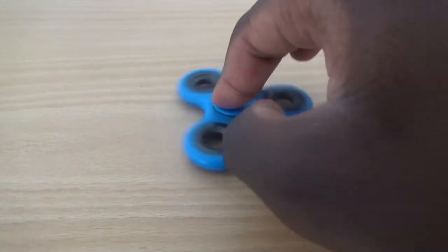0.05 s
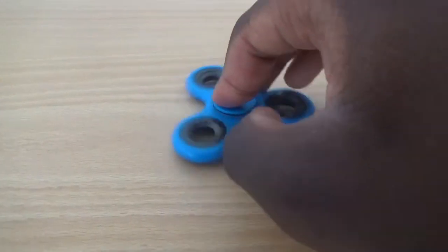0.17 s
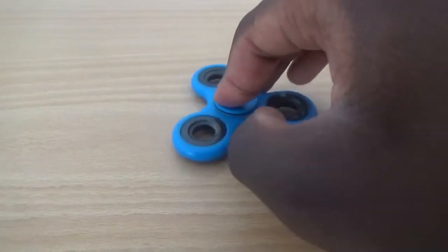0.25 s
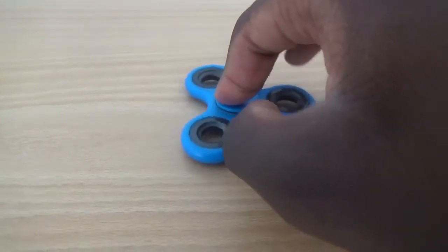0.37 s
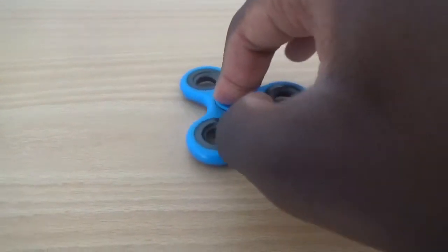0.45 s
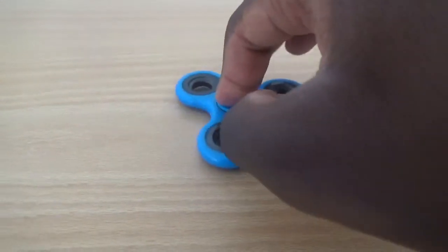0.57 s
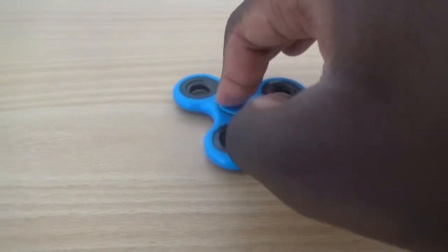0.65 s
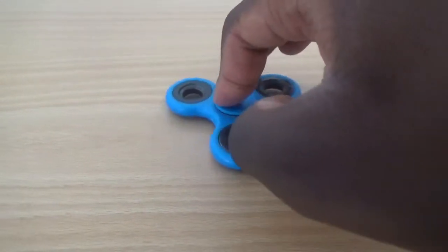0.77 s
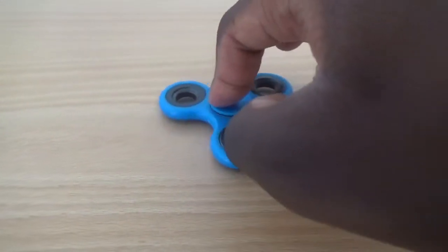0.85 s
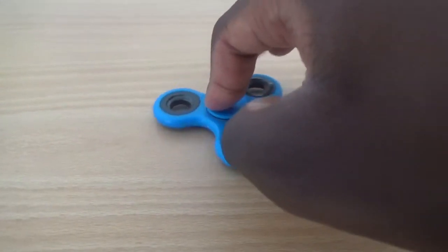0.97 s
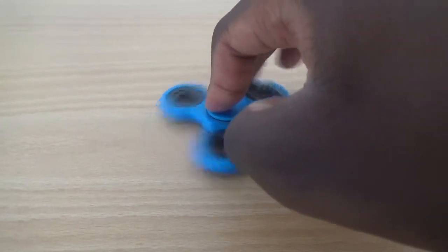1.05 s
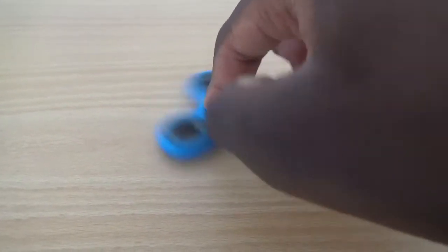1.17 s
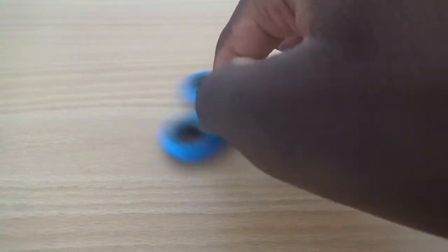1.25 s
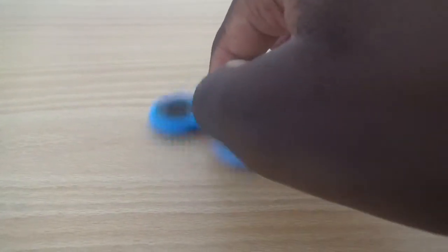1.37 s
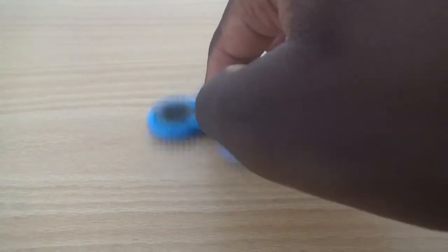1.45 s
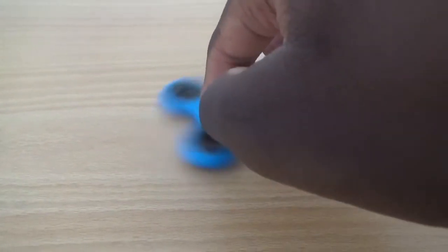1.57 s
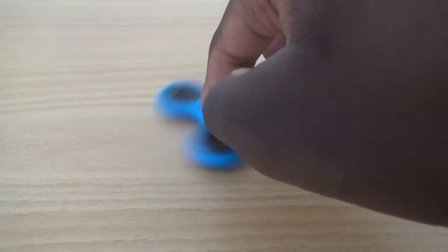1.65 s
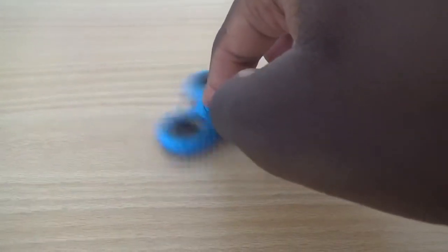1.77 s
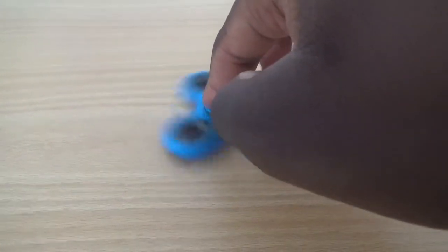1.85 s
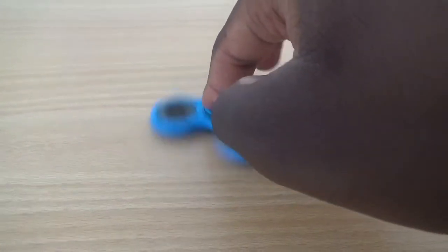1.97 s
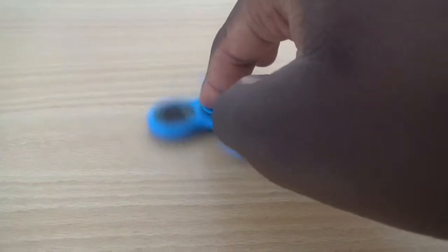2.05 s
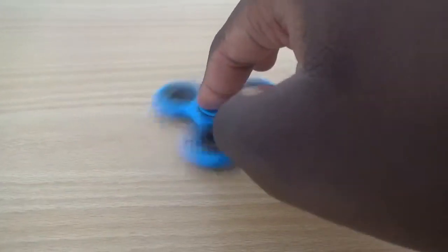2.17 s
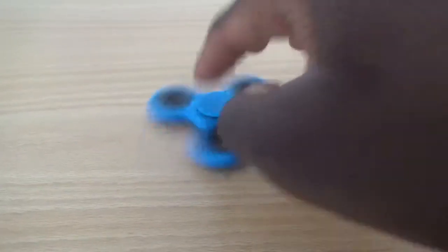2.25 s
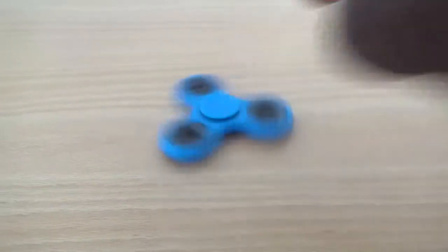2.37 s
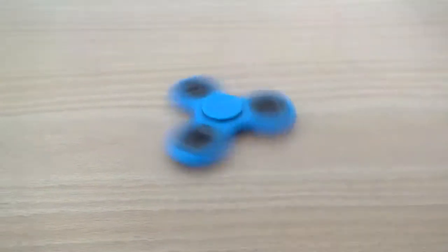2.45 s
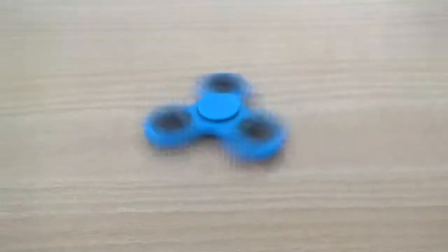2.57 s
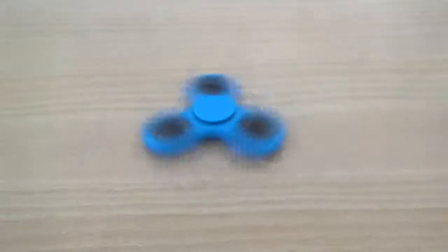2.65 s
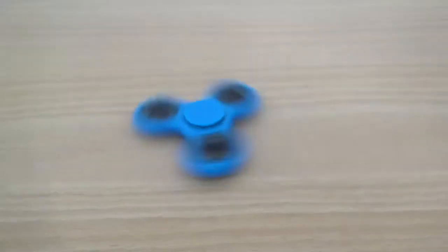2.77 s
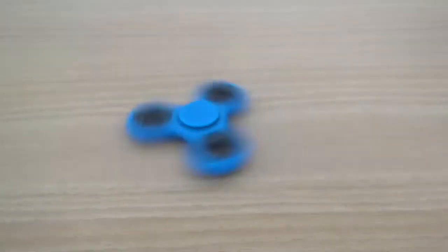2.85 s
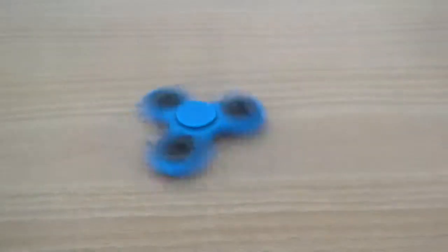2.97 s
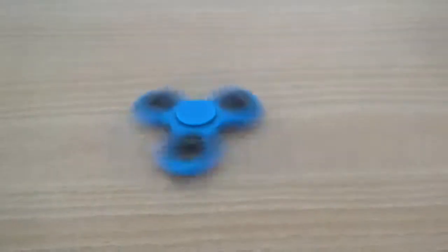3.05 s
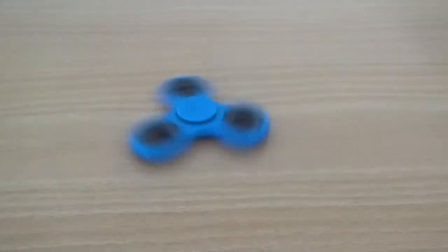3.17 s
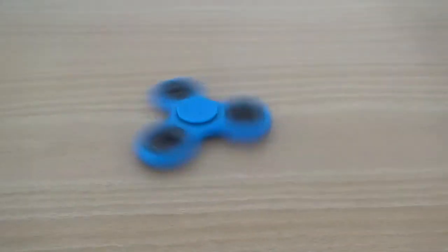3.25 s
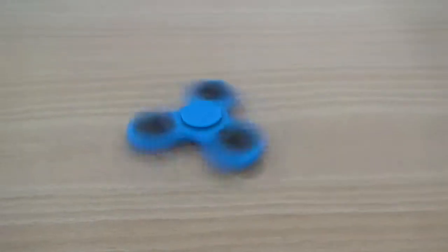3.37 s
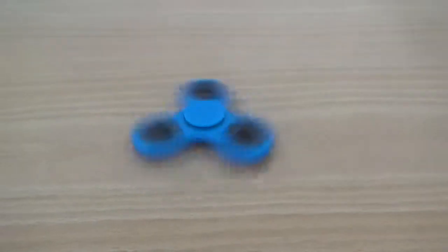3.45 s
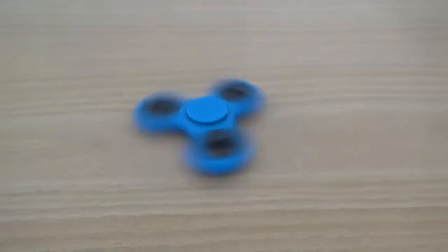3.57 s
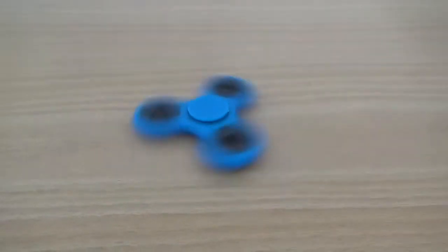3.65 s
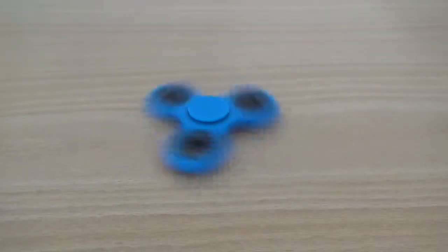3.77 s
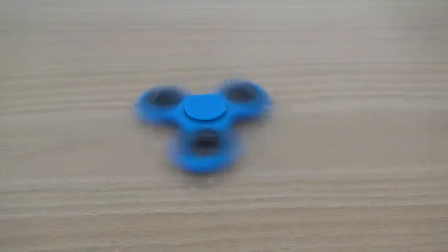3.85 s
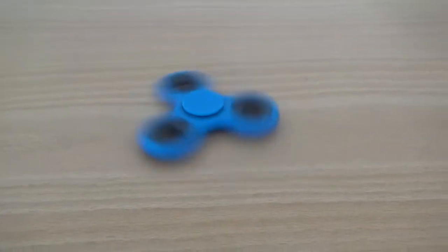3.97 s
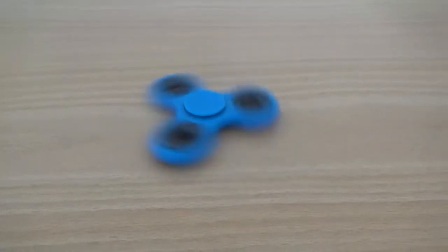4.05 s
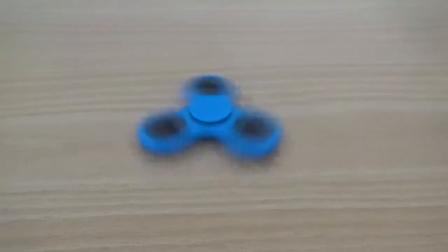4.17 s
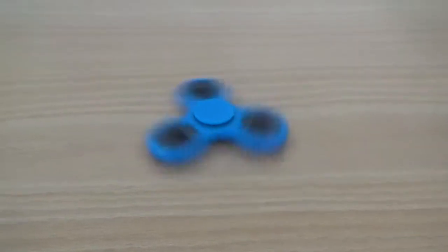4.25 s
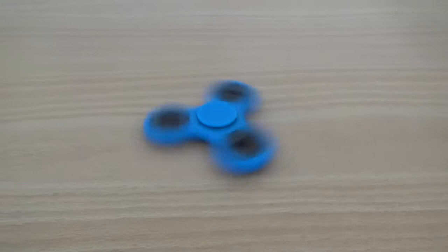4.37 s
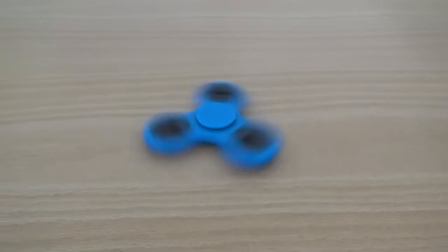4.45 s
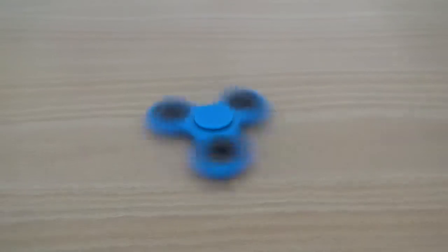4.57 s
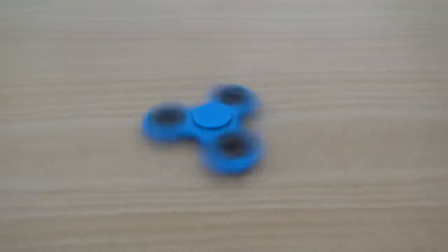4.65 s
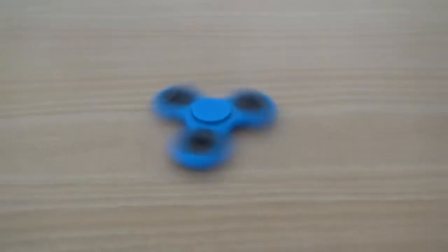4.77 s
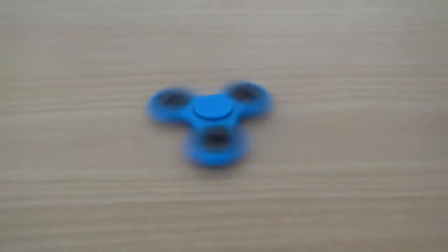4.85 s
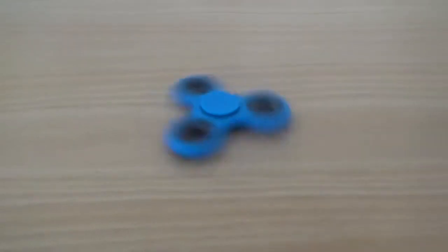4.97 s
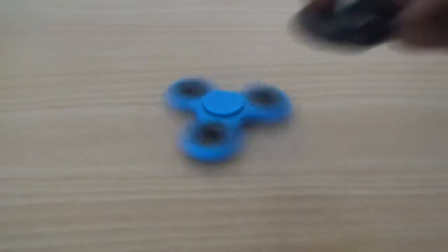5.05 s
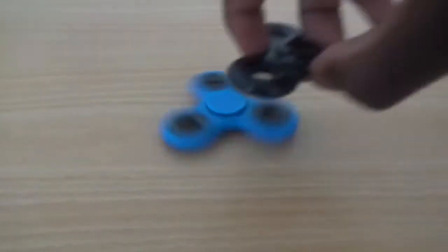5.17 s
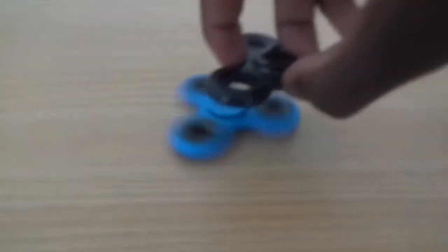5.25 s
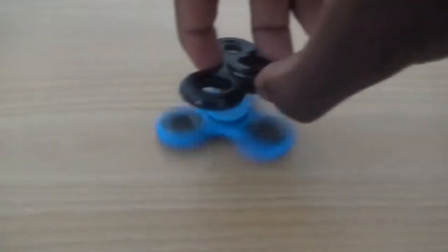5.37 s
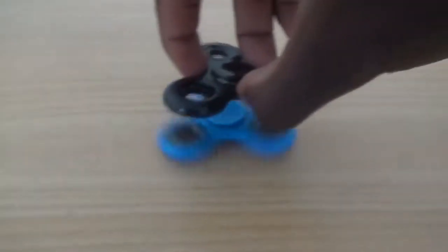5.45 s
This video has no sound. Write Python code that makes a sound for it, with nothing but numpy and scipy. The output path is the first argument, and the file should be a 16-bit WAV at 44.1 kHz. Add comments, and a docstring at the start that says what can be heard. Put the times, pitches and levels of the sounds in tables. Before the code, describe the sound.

After a brief nudge, a fidget spinner whirrs on a wooden tabletop, its bearings ticking and rattling in a quiet room.

```python
"""A plastic fidget spinner on a wooden table is nudged, flicked under a fingertip, then spins freely.
Its steel bearing balls drum the tabletop as they roll. They also tick against their tracks and make
the plastic cap ring, while the spinning part clacks in its slightly loose bearing.
Behind it are a swish of the hand, a few soft bumps on the table, a faint pulsing electronic whine
and the hum of a quiet room."""
import sys
import numpy as np
from scipy import signal
from scipy.fft import rfft, irfft
from scipy.io import wavfile
from scipy.ndimage import uniform_filter1d, map_coordinates

SR = 44100
rng = np.random.default_rng(int(sys.argv[2]) if len(sys.argv) > 2 else 0)


def to_wav(s):
    """Save 16-bit WAV."""
    ch = np.atleast_2d(s).T  # columns
    pcm = np.round(np.clip(ch, -1, 1) * 32767)  # PCM
    wavfile.write(sys.argv[1], SR, pcm.astype(np.int16))


N = 243431
T = np.arange(N) / SR

# A mode is a pitch at which a thing likes to ring; the narrower it is, the longer it rings.
# Modes of tabletop and spinner together: pitch_hz, width_hz, gain_db
WOOD_FREE = [(172, 5, -11), (211, 8, -2), (239, 18, 0), (260, 20, -3.5), (312, 26, -12), (345, 8, -5),
             (397, 29, -18.5), (451, 37, -20), (525, 24, -15.5), (598, 25, -17), (673, 67, -22),
             (750, 50, -21), (808, 19, -19), (905, 40, -18), (950, 40, -15), (1020, 120, -25)]  # spinning freely
WOOD_PRESSED = [(213, 9, -4), (234, 8, 0), (259, 21, -1), (319, 12, -9), (340, 14, -8), (401, 23, -10),
                (527, 22, -8), (599, 31, -13), (642, 21, -13), (748, 40, -13), (815, 25, -16),
                (896, 30, -13), (951, 33, -12), (1016, 73, -20), (1138, 39, -19)]  # under the fingertip
WOOD_RUBBED = [(247, 41, -2.5), (289, 43, -1.5), (410, 48, -23), (535, 15, -12.5), (613, 8.1, -11),
               (740, 83, -19), (946, 37, -26)]  # gripped and slid along
# Modes of the spinner's own parts: pitch_hz, width_hz, gain_db
CAP_FREE = [(1360, 90, -1), (1666, 45, 1.5), (1880, 45, -1.5), (2160, 70, 1), (2270, 70, 9),
            (2600, 200, -5), (4450, 250, -9), (5780, 110, -5), (6160, 140, 2), (7830, 220, 5.5),
            (8130, 280, 0), (8550, 350, -2), (9600, 450, -4), (10380, 280, -2)]  # plastic body and cap
CAP_HELD = [(1370, 80, 0), (1660, 70, -2), (1900, 60, -3), (2290, 55, 5), (5780, 110, 0), (6300, 180, 2),
            (6620, 180, -1), (6900, 140, -1), (7480, 220, -5), (8400, 300, 3.5), (9950, 450, -3)]  # cap stiffened by the fingertip
STEEL_TRACKS = [(6250, 160, -5), (7900, 260, -1.5), (8700, 350, -2), (9500, 350, -2), (10300, 350, -1.5)]  # the rings the balls run in

# How loud the tabletop's deep modes are over time: time_s, level_db
DEEP_LEVELS = [(1.03, -47.5), (1.2, -36.5), (1.49, -37.5), (1.6, -46.5), (1.78, -37), (2.3, -37.5),
               (2.63, -37.5), (3.05, -39.5), (3.35, -37.5), (4.25, -39), (4.92, -40.5), (5.13, -39),
               (5.52, -36)]
# Brief louder swells in the tabletop's deep throb: peak_s, level_db
SWELLS = [(1.39, -39.5), (2.445, -37), (2.647, -32.5), (2.936, -35.5), (2.965, -36), (3.35, -33),
          (3.6, -38), (4.078, -37.5), (4.276, -37), (5.093, -38), (5.154, -36)]
# The bearing runs rougher or smoother: peak_s, half_length_s, tick_gain_db, whirr_gain_db
ROUGH_SPELLS = [(1.172, 0.032, -0.5, 4), (1.523, 0.23, -1.5, 0.5), (1.76, 0.17, 1, 2), (1.88, 0.025, 1, 2),
                (2.026, 0.053, 2, 0.5), (2.078, 0.02, 1, -11), (2.145, 0.032, 0.5, 4),
                (2.366, 0.059, -0.5, -1), (2.608, 0.085, 1.5, 0), (3.21, 0.061, -0.5, 5.5),
                (4.098, 0.24, 0.5, 1), (4.866, 0.075, -1.5, -1), (5.376, 0.58, 1, 0)]
# Treble bands of the lone hard ticks: low_hz, high_hz
TICK_BANDS = [(7000, 8800), (7500, 11000), (9000, 11000)]
# A faint finger scrape, then sliding metallic rings: start_s, length_s, from_hz, to_hz, width_hz, level_db
SCRAPES = [(1.012, 0.025, 8000, 8000, 4000, -59), (1.062, 0.03, 8000, 7500, 3000, -56),
           (1.086, 0.031, 6950, 6400, 700, -48.5), (1.087, 0.019, 9400, 8300, 1800, -51.5),
           (1.114, 0.095, 6230, 6500, 350, -50.5), (1.175, 0.24, 10500, 10600, 700, -55),
           (2.113, 0.07, 7080, 6600, 300, -54), (2.283, 0.035, 10400, 9900, 700, -42),
           (2.31, 0.06, 8760, 7200, 700, -45), (2.352, 0.045, 8240, 7800, 500, -45),
           (2.388, 0.027, 9900, 10400, 600, -43), (2.527, 0.02, 9600, 9300, 1500, -41),
           (2.584, 0.036, 8400, 7500, 500, -42), (2.742, 0.088, 7900, 8200, 350, -47.5),
           (2.77, 0.051, 10200, 10000, 700, -43), (5.357, 0.07, 6930, 6400, 500, -47)]
# Clacks in the bearing: start_s, length_s, bright_db, steel_hz, body_db, body_hz, snap_db
BEARING_CLACKS = [(0.197, 0.0018, -45.5, 9000, -62, 5300, -62), (1.1, 0.005, -43, 6500, -58, 5300, -53),
                  (1.143, 0.0033, -34.5, 9700, -54, 5300, -44), (1.2, .003, -35, 8200, -60, 5300, -55),
                  (1.26, 0.0038, -38, 9900, -48, 5000, -44), (1.318, 0.0042, -45, 8400, -38.5, 4600, -48),
                  (1.375, 0.0027, -38, 10300, -60, 5300, -55), (1.433, 0.0039, -39, 8200, -60, 5300, -58),
                  (1.916, 0.0028, -28, 8900, -49, 5300, -50), (2.023, 0.0044, -35, 9500, -47, 5300, -48),
                  (2.051, .008, -45, 6900, -40, 4130, -45), (2.137, .005, -41, 6900, -56, 5300, -54),
                  (2.262, 0.0051, -33.5, 8000, -47, 5300, -48), (2.438, .007, -34, 7700, -49, 4300, -43),
                  (2.464, 0.003, -32.5, 9300, -44, 5500, -50), (2.561, 0.0056, -30.5, 9900, -46, 5500, -45),
                  (2.672, 0.012, -29, 9700, -44, 4300, -34.5), (2.796, 0.0053, -35, 10000, -54, 4300, -40),
                  (2.918, 0.009, -29, 7700, -57, 5300, -50), (3.222, 0.0056, -31.5, 8900, -48, 5300, -40),
                  (3.343, 0.004, -33, 7800, -41, 4300, -49), (3.584, 0.0085, -32, 7040, -31, 5340, -40),
                  (3.625, 0.0046, -32.5, 8400, -57, 5300, -53), (3.712, 0.0055, -34, 6900, -51, 5300, -56),
                  (3.771, 0.0073, -32, 6400, -45, 4500, -46), (3.996, 0.003, -34, 9650, -46, 5300, -41.5),
                  (4.119, 0.0048, -33.5, 9900, -54, 5300, -50), (4.18, .003, -32, 9500, -52, 5300, -50),
                  (4.267, 0.0022, -32, 9000, -58, 5300, -54), (4.4265, 0.0061, -32.5, 9800, -40, 4400, -44),
                  (4.553, .003, -33, 10300, -55, 5300, -52), (4.582, 0.0044, -32, 9000, -59, 5300, -52),
                  (4.621, .003, -34.5, 8000, -53, 5300, -54), (5.208, .004, -35, 9200, -54, 5300, -50),
                  (5.364, 0.0047, -34, 8000, -58, 5300, -50), (5.376, 0.005, -31, 7940, -54, 5300, -48),
                  (5.399, 0.0073, -30, 8150, -46, 6250, -39), (5.478, 0.0068, -33, 6650, -56, 5300, -48)]
# The free cap rings for a moment: start_s, level_db
CAP_RINGS = [(3.205, -43.5), (4.142, -41), (5.39, -47)]
# Pushes that slide the spinner into place: start_s, length_s, level_db
HAND_PUSHES = [(0, 0.097, -40.5), (0.162, 0.049, -53)]
# Soft bumps on the table: start_s, thud_db, knock_db
TABLE_BUMPS = [(1.016, -50, -45), (3.13, -35, -50), (3.146, -37, -26.5), (3.17, -41, -45), (3.21, -40, -50),
               (3.335, -38, -35), (3.5, -40.5, -52), (3.605, -37.5, -49), (3.66, -41, -65),
               (3.707, -39, -60), (4.048, -42, -62), (4.22, -40.5, -60)]
# Tones of a distant fan: pitch_hz, level_db
FAN_TONES = [(37.5, -65), (177.6, -59.5), (263.8, -64.5), (355.3, -62), (732, -62.5), (802, -64.5)]

# Tone curves, which say how strong each pitch is in a sound: pitch_hz, gain_db
TICK_FREE_TONE = [(600, -16.5), (1200, 3), (2600, 2), (3500, 0.5), (4400, 3), (5400, -2.5), (6700, 1.5),
                  (7400, 0.5), (7900, -0.5), (10400, -2), (11500, -19.5)]  # a ball's tick, cap free
TICK_HELD_TONE = [(600, -24), (1100, 2), (2400, 1.5), (3600, -2), (4700, -1.5), (5450, -6), (6400, -9),
                  (7150, -1.5), (8400, -7), (10500, -8.5), (11500, -17)]  # a ball's tick, cap held
BOUNCE_TONE = [(2500, -19), (5200, -22), (6200, -6), (7100, -7), (7900, 0), (10400, -1), (11800, -25)]
SNAP_TONE = [(900, -20), (1700, -4), (2400, 1), (3200, 0), (4400, -3), (6000, -18)]
NUDGE_TICK_TONE = [(1200, -9), (2700, 2), (3400, -6), (4200, 4), (5000, -17), (8000, -24)]
THUD_TONE = [(35, -55), (70, -2.5), (120, -4), (170, 9), (260, -1), (600, -26.5)]  # a soft thud on the table
KNOCK_TONE = [(120, -24), (250, -10), (480, 6), (900, -15), (1600, -20), (5000, -36)]  # a light knock on the table
AIR_TONE = [(25, -19), (55, -4.5), (85, 3.5), (130, 1.5), (320, -8), (450, 2), (650, -5), (930, 1.5),
            (1060, -13), (1230, -15), (1380, 0), (1550, -12.5), (2500, -12), (3500, -18.5), (6000, -21),
            (11000, -28)]  # the room's steady noise
ECHO_TONE = [(60, -15.5), (220, -27), (550, -12.5), (1100, -4), (2300, -6.5), (5000, -4.5), (8000, -13.5),
             (11000, -22.5)]  # sound scattered by the room
LEFT_OVER_RIGHT = [(300, 0), (620, 1), (1100, -2.5), (2000, 2), (4000, 1.5), (6300, 5.5), (8000, 0),
                   (11000, 0.5)]  # how much louder the left side is

FLICK_S, LIFT_S = 1.04, 2.18  # when the spinner is flicked, and when the fingertip lifts off


def spinner(spin_up_s=0.11, coast_s=22.3, lift_length_s=0.087):
    """The whole spinner: a flick brings it up to speed, then friction slowly brakes it."""
    speed = ramp(FLICK_S, spin_up_s) * np.exp(-np.maximum(T - FLICK_S, 0) / coast_s)  # 1 is full speed
    grip = 1 - ramp(LIFT_S, lift_length_s)
    load = wobble(speed)
    tick_gain, whirr_gain = undb(sum(np.outer(gains_db, hump(T, s, half_s))
                                     for s, half_s, *gains_db in ROUGH_SPELLS))
    return (nudge() + rolling(speed, load, grip, whirr_gain) + rattle(speed, load, tick_gain)
            + scrapes() + clacks())


def wobble(speed, full_turns_per_s=8.6, turn_db=0.66, arm_db=0.4):
    """The load on the balls swings once a turn, and again as each of the three arms goes by."""
    angle = 2 * np.pi * np.cumsum(full_turns_per_s * speed * (1 + 0.041 * walk(6.08))) / SR
    return undb(turn_db * np.sin(angle) + arm_db * np.sin(3 * angle) + 0.9 * walk(110))


def rolling(speed, load, grip, whirr_gain, flutter_hz=19.3, flutter_db=2.8):
    """Rolling balls drum the table: its four deepest modes throb, the rest whirr with the speed."""
    jolts = impacts(rate=2500, spread_db=0) * load
    deep, upper = (np.sqrt(1 - grip) * unit(tabletop(jolts, WOOD_FREE[part]))
                   + np.sqrt(grip) * unit(tabletop(jolts, WOOD_PRESSED[part]))
                   for part in (slice(4), slice(4, None)))
    # The deep hum flutters about 19 times a second.
    fluttering_db = flutter_db * np.sin(2 * np.pi * flutter_hz * T + 0.6 * walk(4))
    deep_db = np.interp(T, *np.transpose(DEEP_LEVELS), left=-120, right=-120)
    throb = even(deep, span_s=0.053) * undb(deep_db + fluttering_db + 1.1 * walk(29) - 1.5)
    swells = even(deep, span_s=0.0085) * sum(undb(db) * hump(T, s, half_s=0.011) for s, db in SWELLS)
    whirr = even(upper, span_s=0.18) * speed ** 0.95 * undb(-42.5 + 0.1 * grip)
    return throb + swells + whirr * whirr_gain


def tabletop(x, modes, band_hz=(165, 1080)):
    """The wood rings, but gives off little sound below its first mode or above its last."""
    return cut(ring(x, modes), 4, band_hz, "bandpass")


def rattle(speed, load, tick_gain, held_db=-47.5, free_db=-43, loosen_s=0.14):
    """Steel balls tick in their tracks and shake the cap, which rings differently once let go."""
    ticks = (impacts(rate=3000, spread_db=1.5) + undb(-7) * rng.standard_normal(N)) * load
    shake = impacts(rate=3000, spread_db=4.5) * load
    free_cap, held_cap = cap(shake, CAP_FREE), cap(shake, CAP_HELD)
    ticks = unit(unit(ticks) + undb(-2.5) * sizzle() * load + undb(-0.8) * hard_ticks())
    free = unit(colour(ticks, TICK_FREE_TONE)) * undb(-3) + free_cap * undb(-2) + tracks() * undb(-4.2)
    held = unit(colour(ticks, TICK_HELD_TONE)) * undb(-2) + held_cap * undb(-1)
    hold = 1 - ramp(LIFT_S, loosen_s)
    turning = (hold * held * undb(held_db) + (1 - hold) * free * undb(free_db)) * speed ** 1.1
    nudged = held * pushing() * undb(-21.5)
    return turning * tick_gain + nudged


def cap(shake, modes, swing_db=2.3, bend_share=0.004):
    """The moving contact favours now one mode of the cap, now another, and bends their pitch a bit."""
    ringing = sum(ring(shake * undb(swing_db * walk(60)), [mode]) for mode in modes)
    bent_time = np.arange(N) + bend_share * np.cumsum(walk(9))
    return unit(map_coordinates(ringing, [bent_time], mode="mirror"))


def sizzle():
    """Now and then a ball skids with a fine, high sizzle."""
    hiss = cut(impacts(rate=1300, spread_db=4), 3, 7200, "highpass")
    return hiss * undb(3.8 * np.clip(walk(170), -2, 1.8))


def hard_ticks(per_band_per_s=75, decay_s=0.00079):
    """Lone hard ticks, each a brief crackle in one of three treble bands."""
    out = np.zeros(N)
    for band_hz in TICK_BANDS:
        strikes = np.abs(impacts(per_band_per_s, spread_db=2))
        fades = signal.lfilter([1], [1, -np.exp(-1 / (decay_s * SR))], strikes)
        out += cut(unit(fades * rng.standard_normal(N)), 2, band_hz, "bandpass")
    return unit(out)


def tracks(wander_share=0.022, swing_db=5.5):
    """The steel tracks ring, each mode wandering in pitch and strength as the contact moves."""
    out = np.zeros(N)
    for hz, width_hz, db in STEEL_TRACKS:
        tone = sing(hz * (1 + wander_share * walk(18)), width_hz)
        out += tone * undb(db + swing_db * np.clip(walk(70), -2, 1.5))
    return unit(out)


def scrapes():
    """A faint finger scrape around the flick, then short sliding metallic rings."""
    return sum(glide(*row) for row in SCRAPES)


def clacks():
    """The spinning part tips in its bearing, jolting steel, plastic and wood; at times the cap rings."""
    out = np.zeros(N)
    for s, length_s, bright_db, steel_hz, body_db, body_hz, snap_db in BEARING_CLACKS:
        run = bounces(length_s)
        bright = unit(colour(run, BOUNCE_TONE))
        steel = undb(-2) * unit(ring(run, [(steel_hz, 700, 0)]))
        add(out, s, bright + steel, bright_db - 1.2, window=44)
        # Halfway through the bounces, the plastic clicks and snaps and the wood knocks.
        middle_s = s + length_s / 2
        body = [(body_hz, 0.4 * body_hz, 0)]
        add(out, middle_s, ring(ring(chatter(decay_s=0.0016), body), body), body_db - 3.5)
        add(out, middle_s, colour(chatter(decay_s=0.0016), SNAP_TONE), snap_db - 4)
        add(out, middle_s, tabletop(chatter(decay_s=0.00056), WOOD_FREE), body_db - 5.5)
    strongest_mode = max(CAP_FREE, key=lambda mode: mode[2])
    for s, db in CAP_RINGS:
        add(out, s, ring(chatter(decay_s=0.012), [strongest_mode]), db)
    return out


def bounces(length_s, typical_gap_s=0.0017, decay_s=0.0011):
    """A rough contact: a quick run of tiny bounces that swells and dies away."""
    age = np.arange(4096) / SR
    gap_s = typical_gap_s * rng.uniform(0.7, 1.3)
    hits = rng.standard_normal(len(age)) * np.exp(-(age % gap_s) / decay_s)
    return hits * arch(np.minimum(age / length_s, 1))


def nudge(tick_s=0.0603, touch_s=1.008):
    """The spinner rubs the wood and ticks once; later the thumb meets an arm and the table rings."""
    rub = tabletop(impacts(rate=1900, spread_db=5), WOOD_RUBBED)
    out = even(rub, span_s=0.022) * pushing()
    add(out, tick_s, colour(chatter(decay_s=0.0049), NUDGE_TICK_TONE), db=-46.5)
    add(out, touch_s, tabletop(colour(signal.unit_impulse(8192), THUD_TONE), WOOD_FREE), db=-37.5)
    return out


def pushing(rise_s=0.0024, fade_s=0.067):
    """How hard the hand slides the spinner at each moment."""
    return sum(undb(db) * burst(s, rise_s, length_s, fade_s) for s, length_s, db in HAND_PUSHES)


def hand_swish():
    """A soft falling swish as the hand comes back in."""
    return glide(start_s=4.95, length_s=0.26, from_hz=5550, to_hz=4550, width_hz=1200, db=-53)


def bumps():
    """Soft thuds and light knocks set the tabletop ringing, each trailing off in a dull shuffle."""
    out, shuffle_power = np.zeros(N), np.zeros(N)
    knock = colour(signal.unit_impulse(4096), KNOCK_TONE)
    for s, thud_db, knock_db in TABLE_BUMPS:
        add(out, s, colour(chatter(decay_s=0.026), THUD_TONE), thud_db + 0.5)
        add(out, s, knock, knock_db + 1)
        add(out, s, tabletop(colour(chatter(decay_s=0.05), KNOCK_TONE), WOOD_FREE), knock_db - 13)
        shuffle_power += (undb(thud_db - 11) * burst(s, rise_s=0.011, hold_s=0.027, fade_s=0.35)) ** 2
    return out + unit(colour(rng.standard_normal(N), THUD_TONE)) * np.sqrt(shuffle_power)


def whine(pitch_hz=4188, blip_hz=3860, period_s=0.04, length_s=0.015, decay_s=0.017):
    """Electronics chirp softly: each chirp opens on a lower blip and ends on a pulse an octave down."""
    age = (T - 0.0093) % period_s
    gate = uniform_filter1d((age < length_s) * np.exp(-age / decay_s), size=70)
    phase = 2 * np.pi * pitch_hz * T + 0.45 * walk(90)
    chirp = undb(-53) * gate * np.sin(phase)
    octave_down = undb(-60) * hump(age, peak_s=0.011, half_s=0.0089) * np.sin(phase / 2)
    blip = undb(-58) * hump(age, peak_s=0.002, half_s=0.0021) * np.sin(2 * np.pi * blip_hz * age)
    return (chirp + octave_down + blip) * ramp(0, 0.2) * undb(walk(1 / period_s))


def room():
    """Steady air noise with the wavering tones of a distant fan."""
    air = unit(colour(rng.standard_normal(N), AIR_TONE)) * undb(-52.5 + 0.5 * walk(4.04))
    fan = sum(undb(db + 1.8 * walk(7)) * np.sqrt(2) * np.sin(2 * np.pi * hz * T + 0.7 * walk(8))
              for hz, db in FAN_TONES)
    return air + fan


def room_echoes(x, decay_s=0.031, delay_s=0.004):
    """Make stereo: the room's echoes, and the balance of low and high, differ from left to right."""
    echoes = chatter(decay_s)
    echoes[:int(delay_s * SR)] = 0
    side = colour(signal.fftconvolve(x, echoes / np.linalg.norm(echoes))[:N], ECHO_TONE)
    left, right = (colour(x, [(hz, sign * db / 2) for hz, db in LEFT_OVER_RIGHT]) for sign in (1, -1))
    return np.array([left + side, right - side])


def undb(db):
    """Turn decibels into a number to multiply by."""
    return np.exp(np.asarray(db) * (np.log(10) / 20))


def unit(x):
    """Scale a sound to an average strength (rms) of 1."""
    return x / np.sqrt(np.mean(x ** 2) + 1e-20)


def even(x, span_s):
    """Even out a sound's strength, as averaged over span_s."""
    return x / np.sqrt(uniform_filter1d(x ** 2, int(span_s * SR)) + 1e-12)


def cut(x, order, edge_hz, kind):
    """Keep the lows, the highs or a band; a higher order cuts more steeply."""
    return signal.sosfilt(signal.butter(order, edge_hz, kind, fs=SR, output="sos"), x)


def colour(x, curve, size=4096):
    """Shape a sound with a tone curve."""
    hz, db = np.transpose(curve)
    log_gain = np.log(undb(np.interp(np.log(np.fft.rfftfreq(size, 1 / SR) + 1), np.log(hz), db)))
    # Keeping one half, doubled, stops the filter from ringing before the sound arrives.
    cepstrum = irfft(log_gain)[:size // 2]
    cepstrum[1:] *= 2
    return signal.fftconvolve(x, irfft(np.exp(rfft(cepstrum, size))))[:len(x)]


def ring(x, modes):
    """Let a sound shake a set of modes; neighbours swing in opposite directions."""
    return sum((-1) ** k * undb(db) * signal.lfilter(*signal.iirpeak(hz, hz / width_hz, fs=SR), x)
               for k, (hz, width_hz, db) in enumerate(modes))


def sing(hz, width_hz):
    """The noisy tone of a rubbed mode, whose pitch may move."""
    slow = cut(rng.standard_normal((2, N)), 2, width_hz / 2, "lowpass")
    phase = 2 * np.pi * np.cumsum(hz) / SR
    return unit(slow[0] * np.sin(phase) + slow[1] * np.cos(phase))


def glide(start_s, length_s, from_hz, to_hz, width_hz, db):
    """A rubbed tone that swells, slides in pitch and dies away."""
    progress = ramp(start_s, length_s)
    return undb(db) * sing(from_hz + (to_hz - from_hz) * progress, width_hz) * arch(progress)


def walk(rate):
    """A smooth random wander of typical size 1 that takes rate steps a second."""
    step = int(SR / rate)
    return unit(uniform_filter1d(np.repeat(rng.standard_normal(N // step + 1), step), step)[:N])


def impacts(rate, spread_db):
    """Tiny random hits, about rate a second, whose strengths vary by spread_db."""
    strength = undb(spread_db * np.clip(rng.standard_normal(N), -2, 2))
    return unit((rng.random(N) < rate / SR) * strength * rng.choice([-1, 1], N))


def chatter(decay_s, size=8192):
    """A puff of noise that dies away quickly."""
    return rng.standard_normal(size) * np.exp(-np.arange(size) / SR / decay_s)


def ramp(start_s, length_s):
    """Rise from 0 to 1 and stay there."""
    return np.clip((T - start_s) / length_s, 0, 1)


def burst(start_s, rise_s, hold_s, fade_s):
    """Rise, hold, then fade away."""
    return ramp(start_s, rise_s) * np.exp(-np.maximum(T - start_s - hold_s, 0) / fade_s)


def hump(time, peak_s, half_s):
    """A bell-shaped swell around peak_s."""
    return np.exp(-((time - peak_s) / half_s) ** 2)


def arch(progress):
    """Swell and fall back as progress goes from 0 to 1."""
    return np.sqrt(np.abs(np.sin(np.pi * progress)))


def add(out, start_s, sound, db, window=256):
    """Mix in a sound so that its loudest stretch of window samples is at db."""
    start = max(int(start_s * SR), 0)
    sound = sound[:N - start] / np.sqrt(uniform_filter1d(sound ** 2, window).max())
    out[start:start + len(sound)] += undb(db) * sound


def scene():
    """Spinner, hand, table and room together."""
    return room_echoes(spinner() + hand_swish() + bumps() + whine() + room())


def record(dry):
    """Cut the treble steeply above 11000 Hz."""
    return signal.sosfilt(signal.ellip(12, 0.1, 80, 11000, fs=SR, output="sos"), dry)


dry = scene()
out = record(dry)
to_wav(out)
```